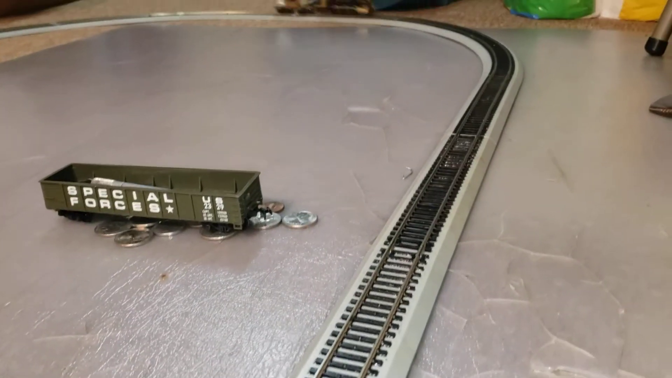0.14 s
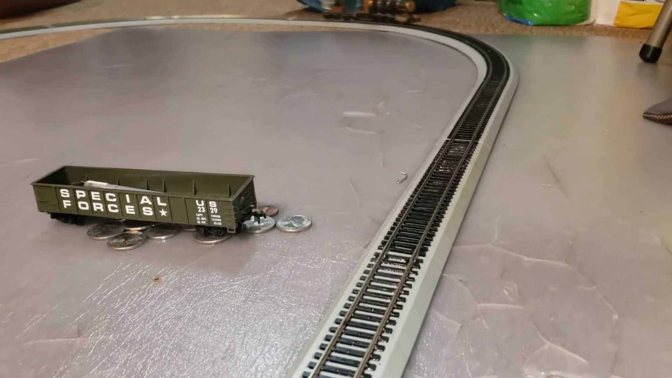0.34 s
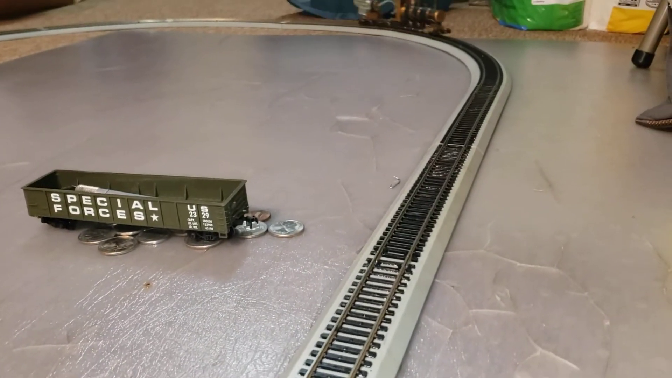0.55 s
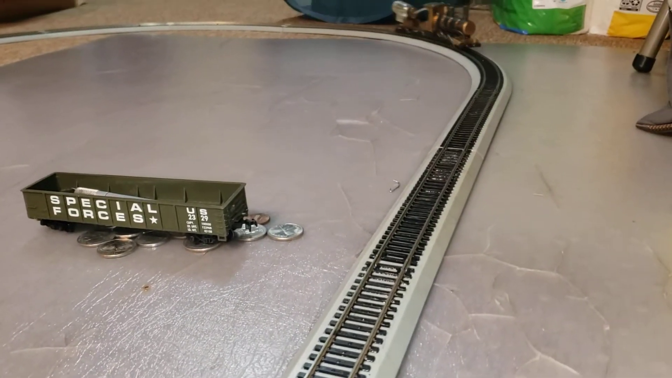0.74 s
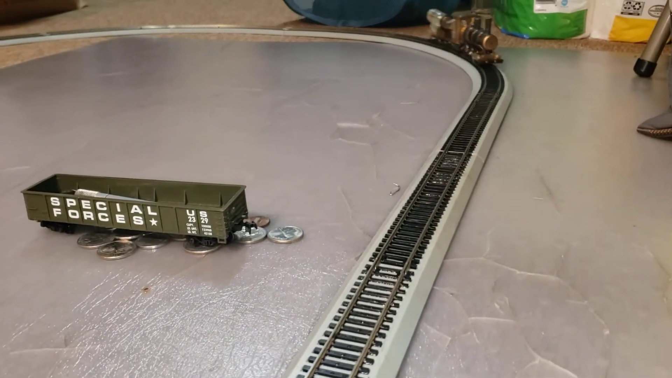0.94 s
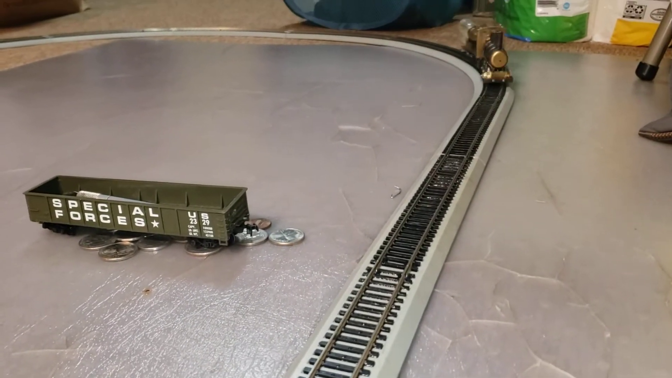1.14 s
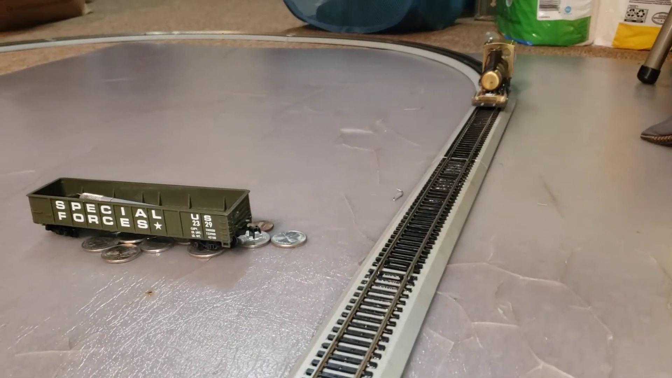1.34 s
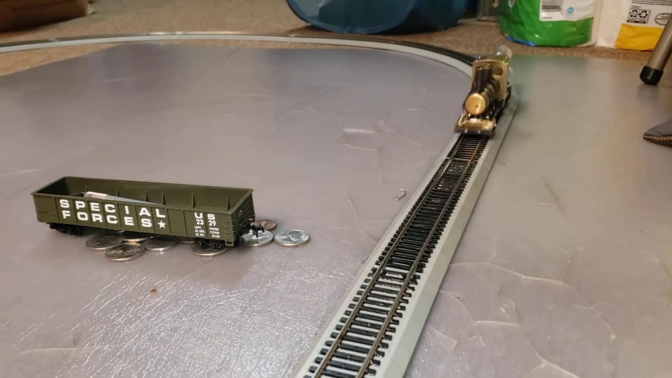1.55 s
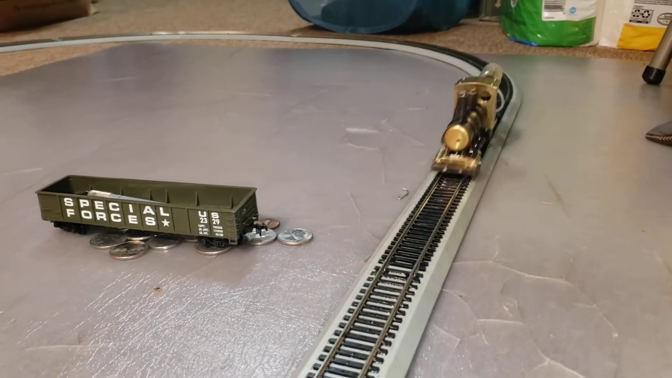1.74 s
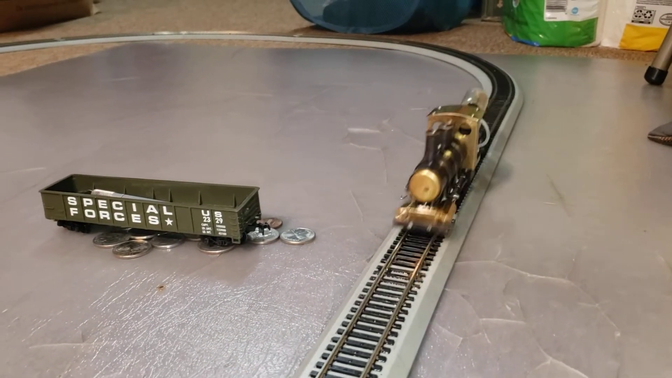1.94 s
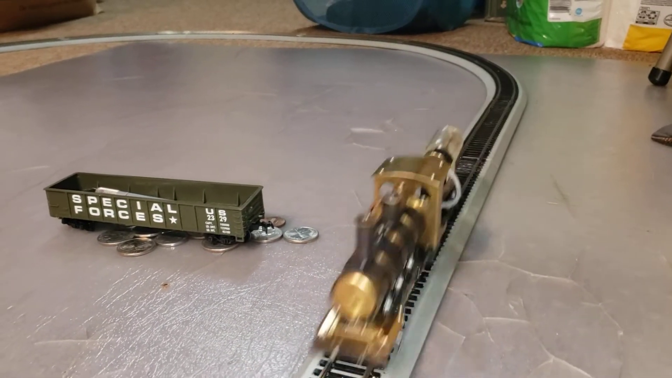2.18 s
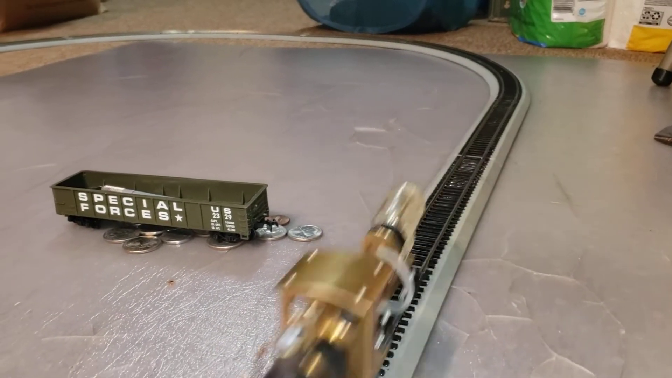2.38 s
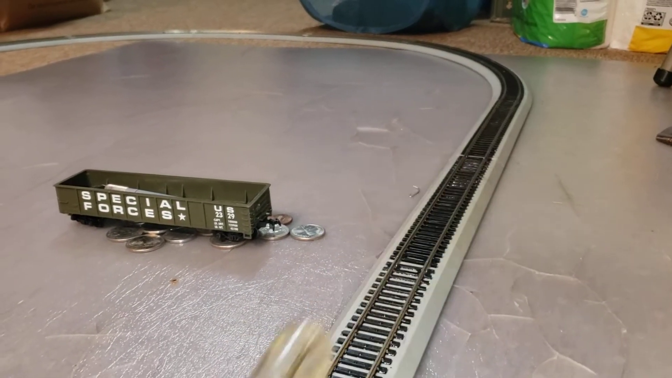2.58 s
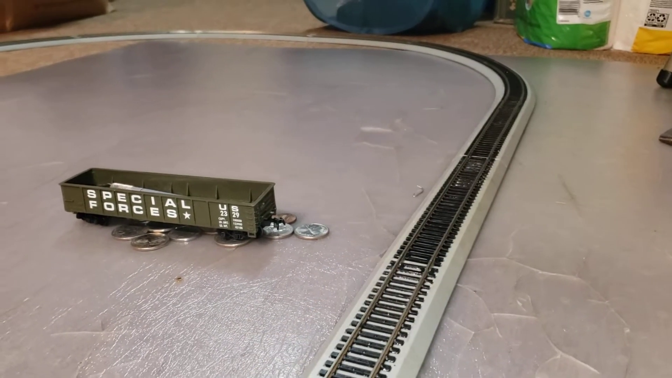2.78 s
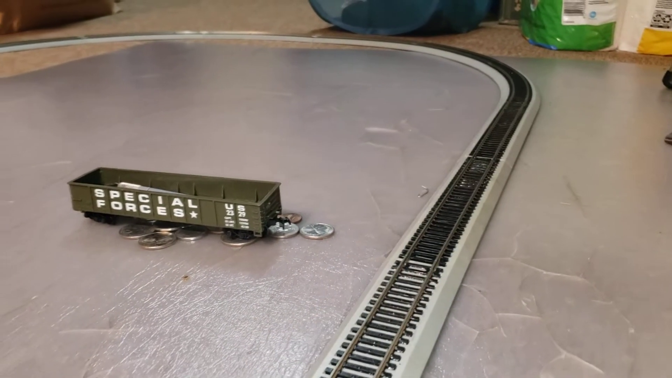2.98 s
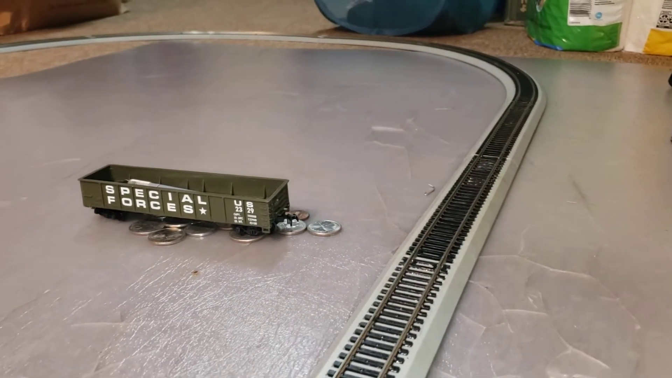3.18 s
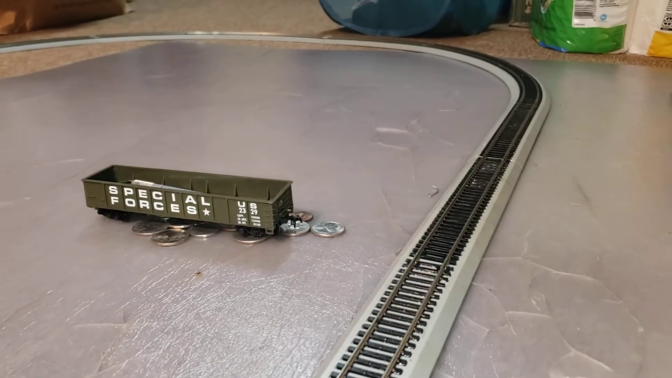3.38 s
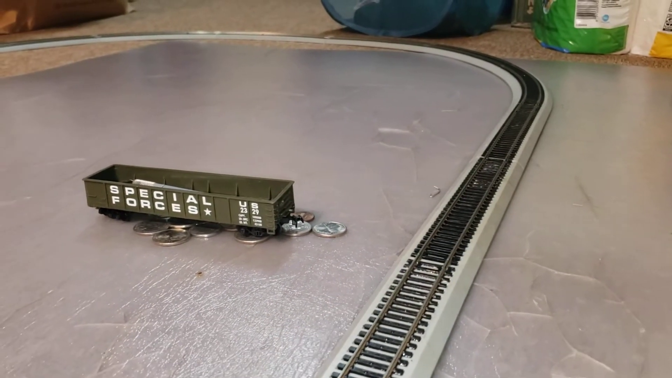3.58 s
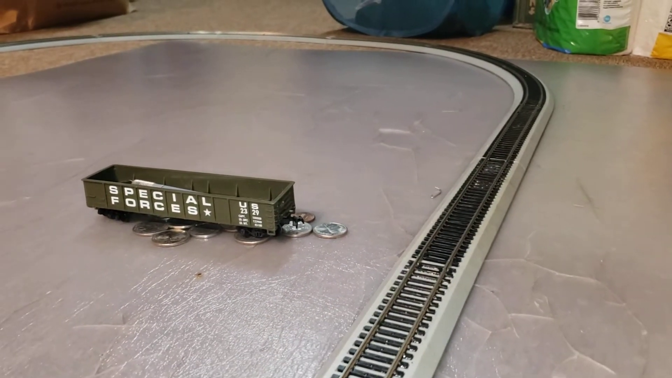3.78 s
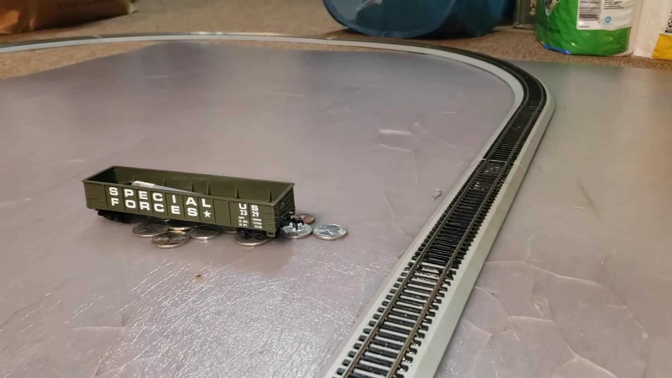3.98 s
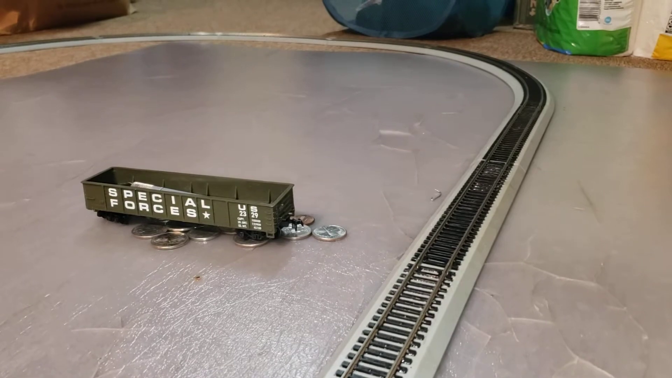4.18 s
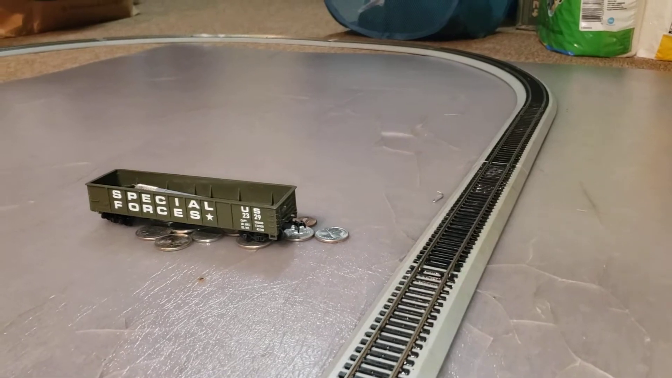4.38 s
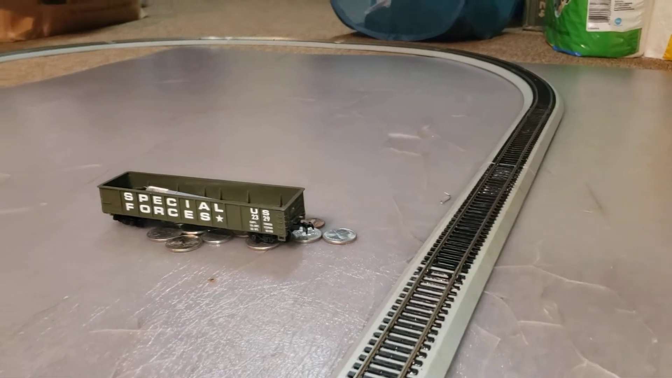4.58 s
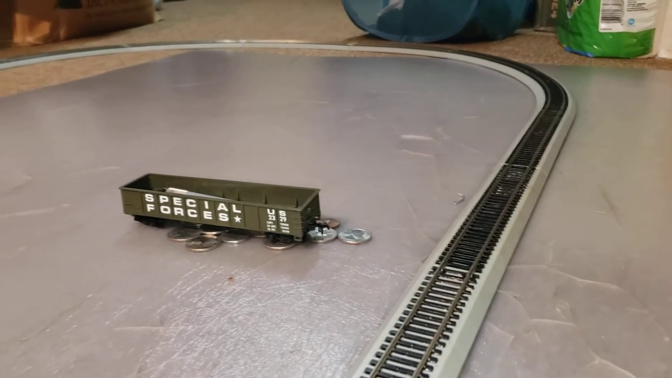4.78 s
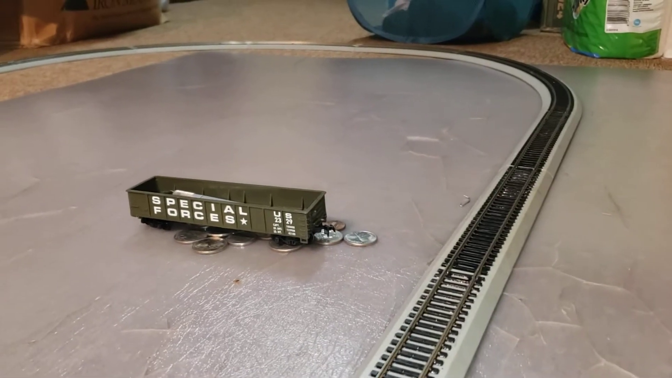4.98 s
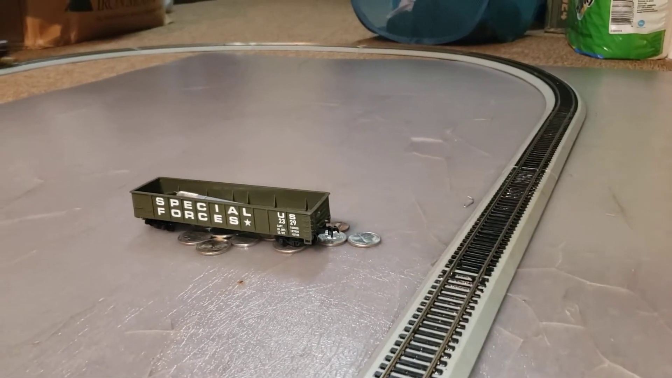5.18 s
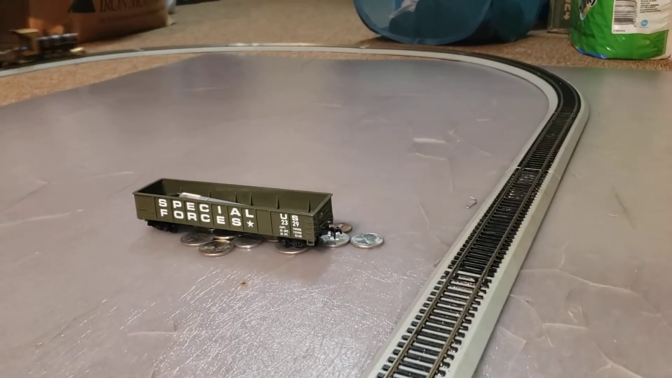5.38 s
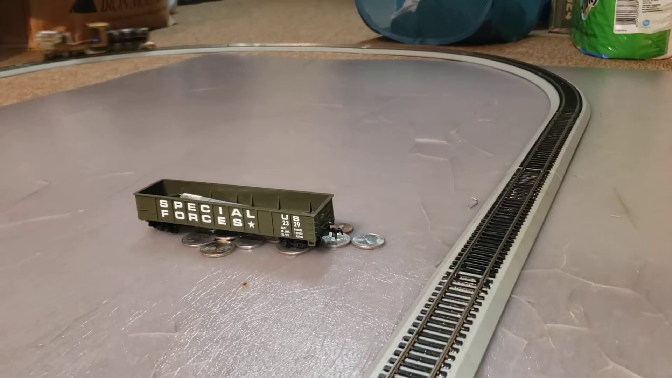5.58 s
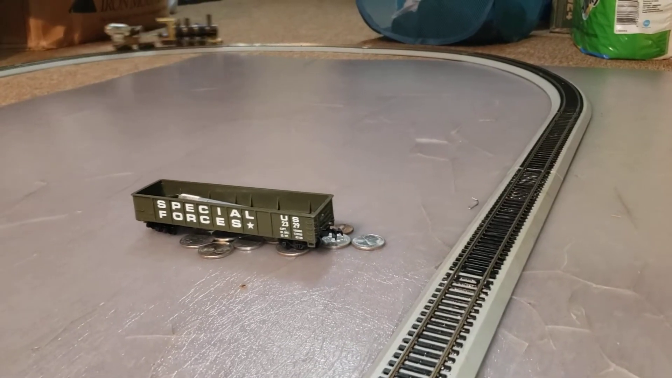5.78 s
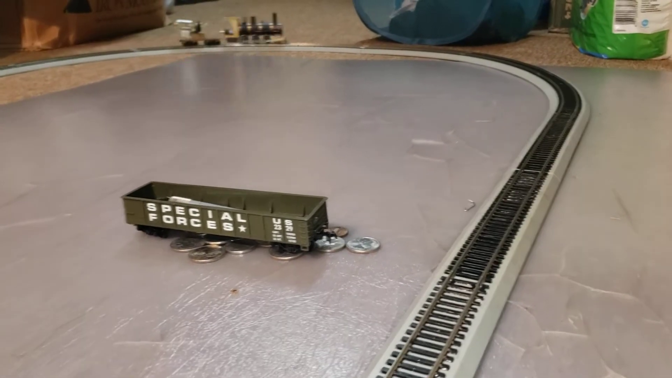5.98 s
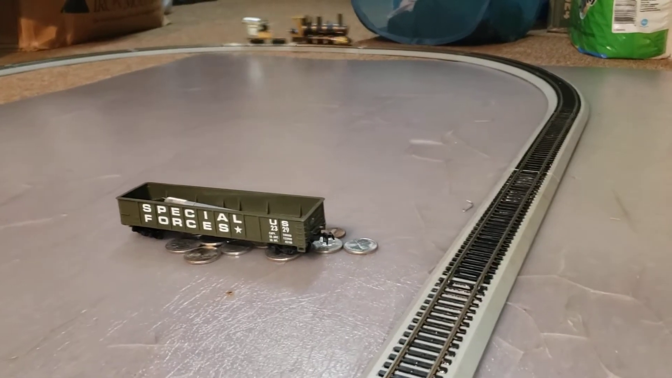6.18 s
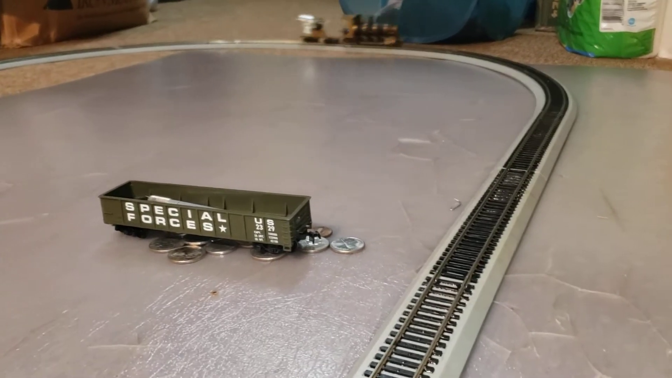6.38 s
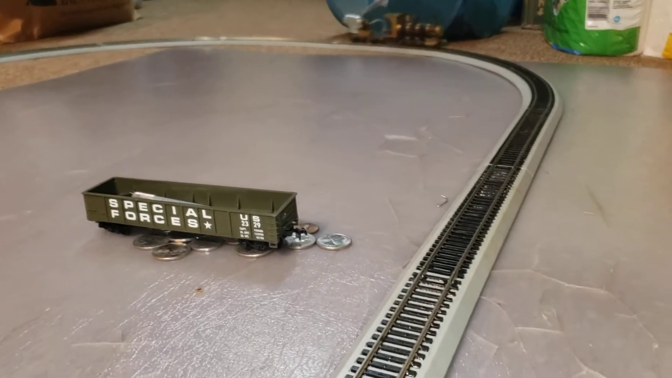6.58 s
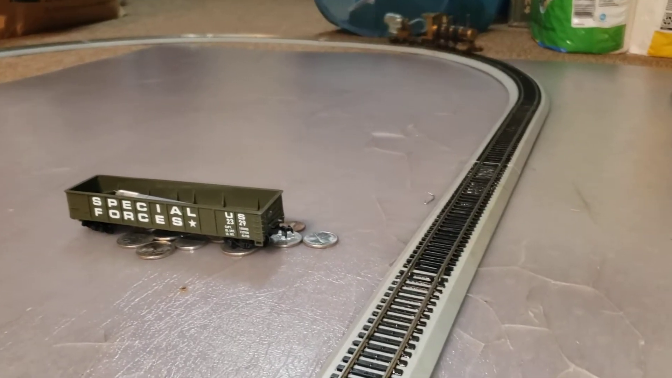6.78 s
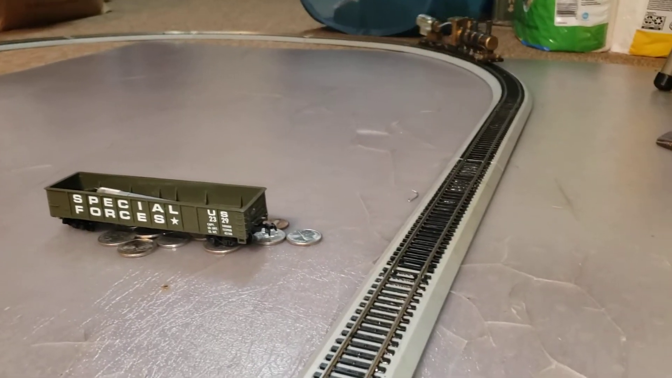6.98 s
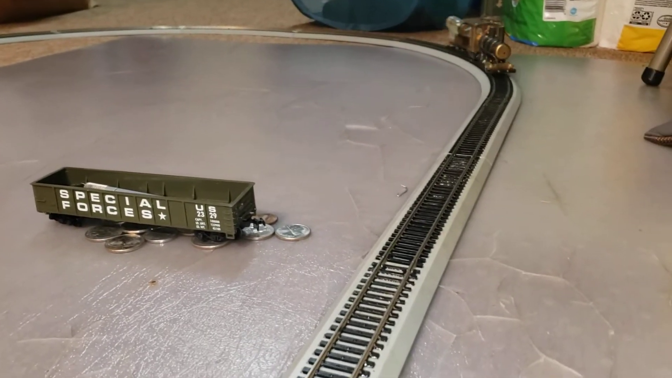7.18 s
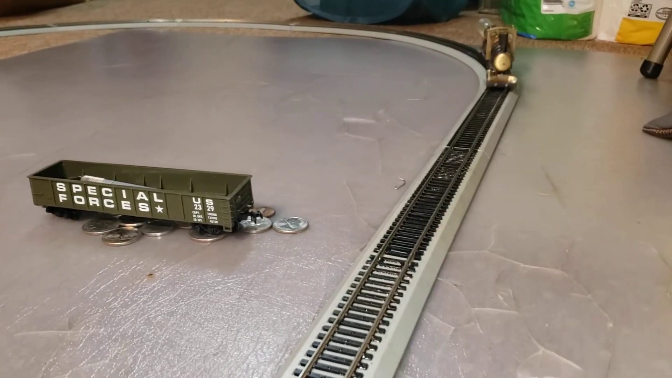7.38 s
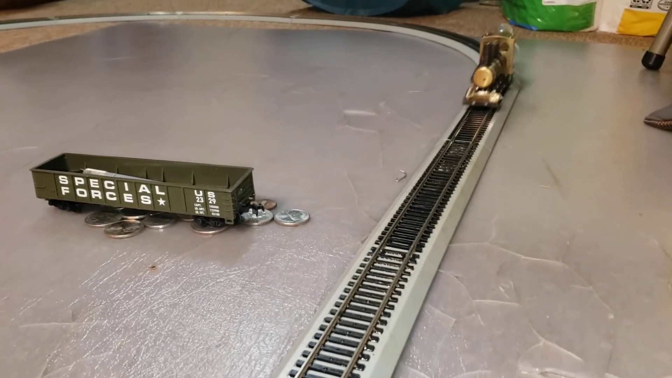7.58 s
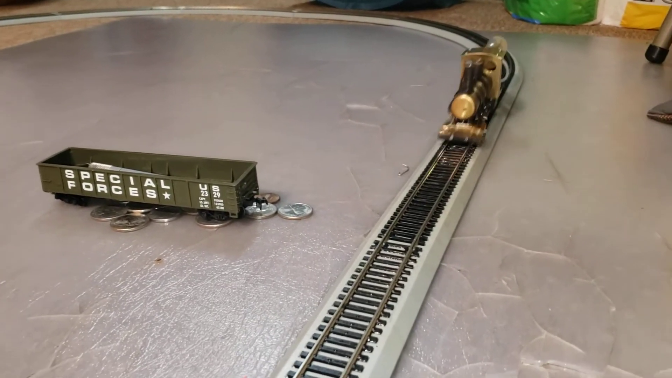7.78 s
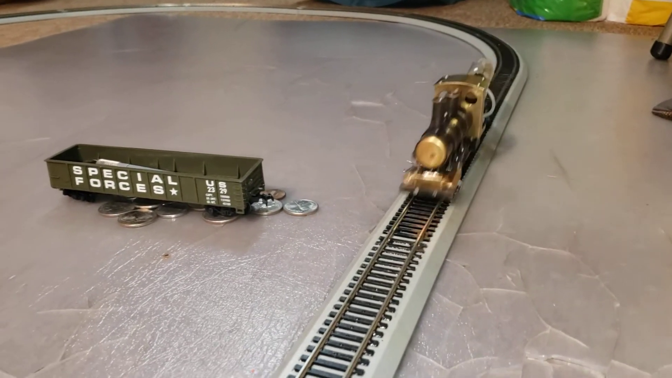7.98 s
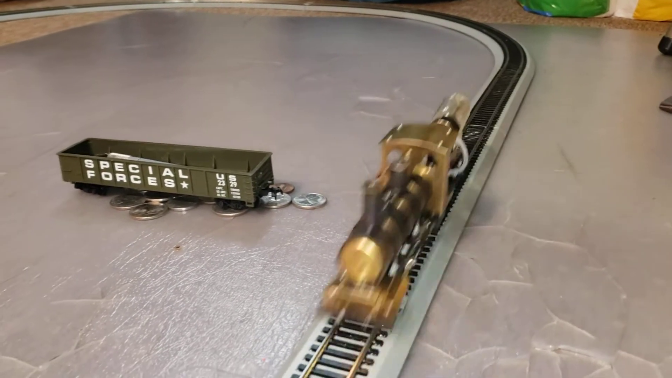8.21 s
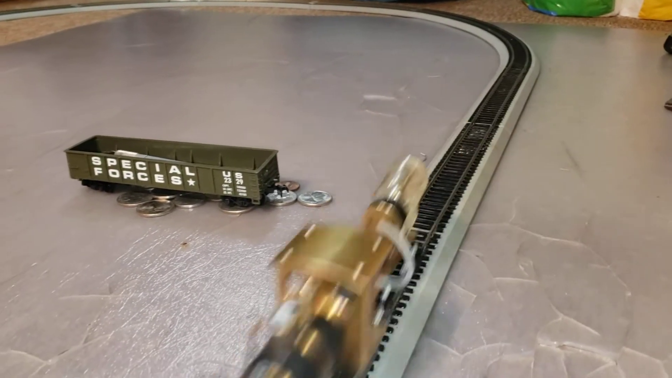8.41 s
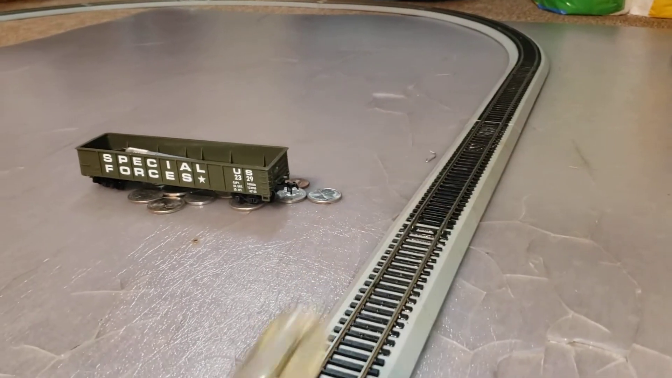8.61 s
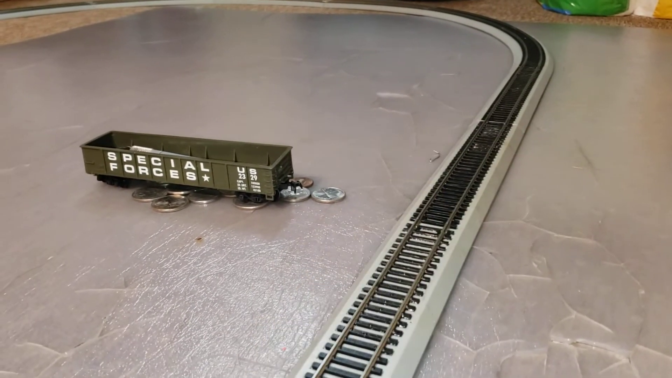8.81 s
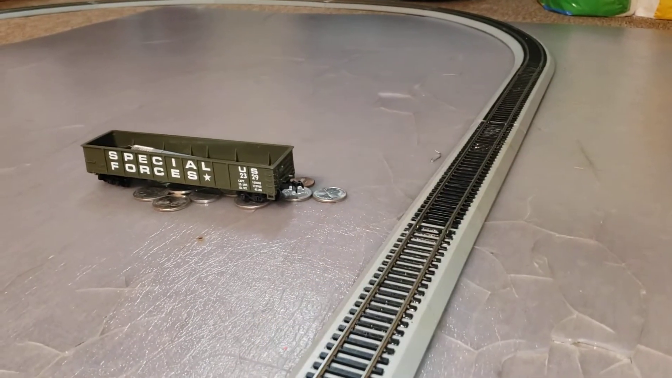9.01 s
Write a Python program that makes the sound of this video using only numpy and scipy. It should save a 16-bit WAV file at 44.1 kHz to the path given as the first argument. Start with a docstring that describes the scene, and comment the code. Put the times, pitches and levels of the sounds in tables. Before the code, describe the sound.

Close indoor pickup of a miniature steam engine circling: crackling bright hiss swells, recedes, then returns, over wheel grind and light track knocks.

```python
"""A small room with a hard floor: a small live-steam engine laps an oval of plastic-bedded track, close to a phone.
Filtered noise hisses and sputters as steam; exhaust puffs and spits are noise puffs with short cracks of water.
Noise grains through resonances make the wheels grind and the bed rumble; damped tones make knocks and ticks.
The phone's two ports hear it with their own lag, level and resonance, over short echoes and finger bumps."""
import sys
import numpy as np
from scipy import signal
from scipy.fft import rfft, irfft
from scipy.io import wavfile
from scipy.ndimage import uniform_filter1d

SR = 44100
rng = np.random.default_rng(int(sys.argv[2]) if len(sys.argv) > 2 else 0)


def unload_wav(signal):
    """Save mono or channel-first audio to the path in sys.argv[1] as 16-bit WAV at rate SR, clipped to [-1, 1]."""
    wavfile.write(
        sys.argv[1],
        SR,
        np.round(np.clip(np.atleast_2d(signal).T, -1, 1) * 32767).astype(np.int16),
    )


N = 399105
LAP_S = 6.01

# engine position: (time into lap [s], distance [m], lead of left port [ms])
ENGINE_PLACE = [(0, 2.14, 0.043), (.55, 2.47, 0.0055), (1.1, 2.15, -0.068), (1.6, 1.17, -0.072),
                (1.95, 0.97, -0.078), (2.2, 0.93, 0.024), (2.4, 0.67, 0.071), (2.7, 0.49, 0.15),
                (3.05, 0.72, 0.417), (3.5, 1.26, 0.46), (4.2, 2.18, 0.47), (4.6, 1.65, 0.38),
                (5.2, 1.96, 0.31)]


def engine_place():
    """Distance in m and left-port lead in ms, repeating each lap."""
    return lap(ENGINE_PLACE)


# jet, nominal: (time into lap [s], hiss level [dB], thin top level [dB], top left minus right [dB])
JET_LEVELS = [(0, -57, -52, 2), (.3, -51.5, -48.5, -5), (.6, -48, -52, -4), (1, -48.5, -53, -6),
              (1.5, -45.5, -53, -1), (2, -44, -44, -9), (2.4, -40.5, -36.5, 0), (2.65, -43, -39, -9),
              (2.9, -36, -36, -4), (3.15, -37.5, -34, -2), (3.55, -40, -40.5, 12), (3.75, -46, -41.5, 7),
              (4.05, -49, -46.5, -2), (4.3, -53, -46.5, 3), (5.1, -51, -50, 2), (5.5, -50.5, -46.5, -1)]
JET_GAIN_DB_PER_LAP = 1
SURGE_S, SURGE_HALF_S, SURGE_DB = 6.28, 0.16, 3


def jet_levels():
    """Hiss level, top level and top pan; pressure creeps up and surges once."""
    hiss_db, top_db, top_pan_db = lap(JET_LEVELS)
    t = np.arange(N) / SR
    pressure_db = JET_GAIN_DB_PER_LAP * t / LAP_S + SURGE_DB * hump(t - SURGE_S, SURGE_HALF_S)
    return hiss_db + pressure_db, top_db + pressure_db, top_pan_db


def steam(hiss_db, top_db, hiss_pan_db, top_pan_db):
    """A jet that sputters as droplets flash; its thin top beams another way than its body."""
    jet = noise(direct=0.034) * (1 + 0.35 * grains(90, 3.5, 0.0014))
    sputter = 1 + 0.25 * grains(62, 4, 0.006)
    body = unit(band(jet * sputter, 5770, 13350))
    body = body * undb(hiss_db + walk(18)) * sides(hiss_pan_db)
    top_sputter = 1 + 0.27 * grains(60, 6.1, 0.0031)
    top = unit(band(jet * top_sputter, 11030, 16000))
    top = top * undb(top_db + 0.65 * walk(21)) * sides(top_pan_db)
    return body + top


# single puffs and sharp spits, on and off the beat:
# (time [s], level [dB], colour [Hz], wetness [0-1, soft puff to sharp spit])
PUFFS_AND_SPITS = [(0.265, -19, 12500, 0.33), (.466, -27.5, 10300, 0.8), (.6242, -33, 11500, .9),
                   (0.7662, -27, 11900, 0.8), (0.9145, -13.5, 10500, 0.86), (1.2625, -22, 11400, .9),
                   (1.585, -19, 10300, 0.45), (1.698, -14, 10300, 0.4), (1.937, -12, 10000, 0.5),
                   (2.167, -16, 13800, 0.9), (2.202, -10, 13000, 0.6), (2.2189, -13.5, 12900, 0.55),
                   (2.3124, -11, 11300, 0.9), (2.4036, -8, 10500, 0.64), (2.4289, -11, 12900, .45),
                   (2.489, -14, 10400, 1), (2.5305, -12.5, 11800, 1), (2.9762, -15, 10400, 0.8),
                   (2.9957, -16, 10600, 0.8), (3.031, -11, 13200, .65), (3.0556, -15, 11500, 0.6),
                   (3.274, -5.5, 14900, 0.4), (3.327, -17, 11600, 0.6), (3.3516, -19, 11400, 1),
                   (3.5602, -12, 10200, 0.5), (3.6377, -15.5, 13900, 0.2), (3.874, -14.5, 12900, 0.5),
                   (4.587, -18, 14500, .5), (5.2303, -23, 12900, 0.4), (5.502, -25, 11500, 0),
                   (6.7177, -25.5, 10600, 0.7), (6.8874, -24.5, 10500, 0.4), (6.966, -17, 10150, 0.36),
                   (7.0, -20, 11000, 0.7), (7.214, -9, 10500, 0.3), (7.265, -12, 10420, 0.88),
                   (7.3153, -11, 9450, 1), (7.5208, -22, 10840, 0.79), (7.6794, -16.5, 10300, 0.6),
                   (7.7478, -15, 10200, 0.47), (7.7773, -18, 9960, 0.5), (8.0134, -20, 9900, 0.6),
                   (8.2317, -14, 13200, 0.77), (8.247, -10.5, 12800, 0), (8.2653, -22, 12360, .7),
                   (8.4136, -5.5, 13400, 0.54), (8.443, -11.5, 12700, 0.1), (8.5763, -9.5, 10600, 0.9),
                   (8.7283, -19, 11600, 0.2), (8.9114, -21.5, 10900, 0.3), (8.959, -11, 11000, 0.3),
                   (8.9806, -16, 11000, 0.93), (9.015, -15, 12880, 0.7)]
# running count of exhaust beats, setting the engine's pace: (time [s], count [beats])
BEAT_COUNT_AT = [(-.02, -7), (.478, 0), (.915, 7), (1.275, 13), (1.444, 16), (1.698, 21), (1.937, 26),
                 (2.313, 34), (2.612, 41), (6.104, 111), (6.289, 114), (6.815, 124), (7.41, 136),
                 (8.116, 152), (8.577, 163), (9.06, 175)]
BEAT_DB, BEAT_DB_PER_MS, BEAT_SCATTER_DB = 22, -18, 3  # over the hiss; per ms of left lead
BEAT_HZ, BEAT_HZ_PER_MS, BEAT_SCATTER_HZ = 12300, 6030, 500
BEAT_JITTER_S, BEAT_WET, BEAT_CLEARANCE_S = 0.0015, 0.15, 0.012
PUFF_RISE_S = 0.0011


def exhaust_rows(hiss_db, lead_ms):
    """Single puffs and spits plus the regular beats that fall clear of them."""
    when, count = np.transpose(BEAT_COUNT_AT)
    s = np.interp(np.arange(count[0], count[-1]), count, when)
    chance = rng.standard_normal((N // 1000, 3))[:len(s)].T
    s = np.clip(s - 2 * PUFF_RISE_S + BEAT_JITTER_S * chance[0], 0.02, N / SR - 0.02)
    i = (s * SR).astype(int)
    db = hiss_db[i] + BEAT_DB + BEAT_DB_PER_MS * lead_ms[i] + BEAT_SCATTER_DB * np.tanh(chance[1])
    hz = BEAT_HZ + BEAT_HZ_PER_MS * lead_ms[i] + BEAT_SCATTER_HZ * chance[2]
    regular = np.transpose([s, db, hz, np.full(len(s), BEAT_WET)])
    gap_s = np.abs(s[:, None] - np.array(PUFFS_AND_SPITS)[:, 0]).min(axis=1)
    return np.vstack([PUFFS_AND_SPITS, regular[gap_s > BEAT_CLEARANCE_S]])


FLOOR_LAG_S, FLOOR_DB = 0.0004, -5.5  # the floor mirrors each crack


def puffs(rows, pan_db):
    """A puff of steam swells and fades; a droplet cracks at its height in under a millisecond."""
    lead_in_s = 0.015
    out, t = np.zeros((2, N)), np.arange(int(0.05 * SR)) / SR - lead_in_s
    rush = rng.standard_normal((N // 1000, len(t)))
    for (s, db, hz, wet), air in zip(rows, rush):
        wet = np.clip(wet, 0, 1)
        crack_decay = np.exp(-np.where(t < 0, -t / 0.0001, t / 0.00009))
        crack = 1.76 * wet * np.cos(2 * np.pi * hz * t) * crack_decay
        crack = crack + undb(FLOOR_DB) * np.interp(t - FLOOR_LAG_S, t, crack)
        # the wetter the row, the more sudden its start
        rise_s = 0.0002 + 0.0012 * (1 - wet) ** 2
        fall_s = 0.0012 + 0.0016 * (1 - wet)
        swell = np.exp(-np.where(t < 0, -t / rise_s, t / fall_s))
        puff = swell * band(air, hz - 2000, hz + 2500)
        puff = 0.38 * (1 - 0.92 * wet) * puff * np.sqrt(np.sum(swell ** 2) / np.sum(puff ** 2))
        # broadband blow of the valve gear
        blow = 0.16 * air * (t > 0) * np.exp(-np.abs(t) / 0.00068)
        pan = sides(pan_db[int(s * SR)])
        add(out, s + PUFF_RISE_S - lead_in_s, undb(db) * np.outer(pan, crack + puff + blow))
    return out


# rail resonances, low then high: (centre [Hz], width [Hz], relative level [dB])
RAIL_DRONE = [(1050, 340, 0), (1775, 730, 5.5), (2405, 1060, 3.5)]
RAIL_GRIT = [(3220, 1090, 8), (4020, 200, -2.5), (5410, 1020, -1)]
DRONE_DB, GRIT_DB, RAIL_NOTES_DB = -45.5, -45, -50  # nominal at 1 m
BEATS_PER_TURN = 4


def wheels(near_db, pan_db):
    """Rough treads excite the rails in dense grains, throbbing as the wheels and rods go round."""
    beat = np.interp(np.arange(N) / SR, *np.transpose(BEAT_COUNT_AT))
    turn = 2 * np.pi * beat / BEATS_PER_TURN
    throb = undb(0.19 * np.sin(turn) + 0.51 * np.sin(2 * turn))
    tread = noise(direct=0.28) * throb
    low_tread = noise(direct=0.45) * throb * (1 + 0.33 * grains(140, 7.1, 0.0056))
    drone = unit(ring(low_tread, RAIL_DRONE)) * undb(DRONE_DB + near_db)
    high_tread = tread * (1 + 0.62 * grains(250, 1.7, 0.0015))
    grit = unit(ring(high_tread, RAIL_GRIT)) * undb(GRIT_DB + near_db)
    notes = rail_notes(tread) * undb(RAIL_NOTES_DB + near_db)
    return (drone + grit + notes + noise_swells(tread)) * sides(pan_db)


# bands of noise, some wheel growl and some steam hiss:
# (time of first peak [s], half length [s], centre [Hz], width [Hz], level [dB])
NOISE_SWELLS = [(1.347, 0.7, 4080, 700, -55), (1.91, 0.26, 3220, 900, -51.5),
                (2.048, 0.27, 1630, 400, -47.5), (2.018, 0.12, 1130, 350, -55.5),
                (2.456, 0.29, 2410, 1180, -45), (2.497, 0.34, 4630, 1600, -52.5),
                (2.722, 0.18, 1685, 597.3, -51), (2.8, 0.25, 11600, 1400, -43),
                (3.95, 0.39, 14600, 1600, -44.5), (4.3, 0.64, 1720, 190, -52.5),
                (5.005, 1, 684, 240, -62.5), (5.845, 0.17, 2550, 400, -58), (6.234, 0.2, 1502, 160, -56),
                (6.791, 0.82, 710, 300, -68), (8.428, .2, 2530, 1798, -51)]
SWELL_FLUTTER_DB = 2


def noise_swells(source):
    """Bands of noise, some wheel growl and some steam hiss, that swell at the same spots each lap."""
    out, t = np.zeros((2, N)), np.arange(N) / SR
    for s, half_s, hz, width_hz, db in NOISE_SWELLS:
        swell = hump((t - s + half_s) % LAP_S - half_s, half_s) * (t > s - half_s)
        noise_band = unit(band(source, hz - width_hz / 2, hz + width_hz / 2))
        out = out + undb(db + SWELL_FLUTTER_DB * walk(14)) * swell * noise_band
    return out


RAIL_NOTE_WIDTH_HZ, RAIL_NOTE_WANDER_DB = 59, 3.5


def rail_notes(tread, count=22):
    """Many narrow rail resonances, each swelling and fading on its own."""
    notes_hz = np.geomspace(1350, 4800, count) * (1 + 0.02 * rng.standard_normal(count))
    half_hz = RAIL_NOTE_WIDTH_HZ / 2
    return unit(sum(undb(RAIL_NOTE_WANDER_DB * walk(16)) * band(tread, hz - half_hz, hz + half_hz, order=1)
                    for hz in notes_hz))


# ticks, rattles, squeaks of rods, couplings, flanges:
# (time [s], nominal peak level [dB], pitch [Hz], ring [ms])
METAL_TICKS = [(1.966, -34, 2840, 3), (2.33, -31, 1920, 3.7), (2.412, -32.5, 1270, 1.6),
               (2.431, -31, 2660, 2.7), (2.483, -29, 4200, 2), (2.612, -30.5, 2370, 2.6),
               (2.653, -36, 1690, 4), (2.756, -31, 2910, 3), (3.034, -31, 2600, 1.8), (3.564, -33, 3560, 3),
               (3.641, -34.5, 3620, 1.8), (3.874, -37.5, 3340, 2), (4.6763, -30, 3140, 0.65),
               (4.6777, -28, 980, .5), (5.166, -42, 3800, 3), (5.232, -41, 3700, 2.7),
               (5.261, -37, 3800, 1.5), (7.376, -38, 4090, 6.8), (7.542, -40, 4000, 8.5),
               (7.71, -31, 3860, 1.7), (7.868, -44, 3300, 4.2), (7.937, -39, 1620, 42),
               (8.017, -37, 2870, 4.5), (8.349, -30, 2010, 1.02), (8.414, -29, 2947, 3.3),
               (8.45, -34, 2760, 3.3), (8.493, -31.5, 2500, 4.2), (8.745, -33, 3100, 2.4),
               (9.015, -38.5, 4560, 2)]
TICK_RISE, TICK_ROUGH = 0.4, 1.1  # rise as share of ring; loose rattle as share of tone


def ticks(pan_db):
    """Short blows and scrapes, each ringing near its pitch with a loose rattle around it."""
    out, t = np.zeros(N), np.arange(-1300, 3500) / SR
    loose = rng.standard_normal((len(METAL_TICKS), len(t)))
    for (s, db, hz, ring_ms), air in zip(METAL_TICKS, loose):
        rattle = unit(band(air, 0.75 * hz, 1.5 * hz, order=1))
        shake = np.cos(2 * np.pi * hz * t) + TICK_ROUGH * rattle
        decay = np.exp(-np.where(t < 0, -t / TICK_RISE, t) * 1000 / ring_ms)
        add(out, s + t[0], undb(db) * shake * decay)
    return out * sides(pan_db)


# bed resonances: (centre [Hz], width [Hz], relative level [dB])
BED_MODES = [(214.7, 122, 5), (363, 268, 6.5)]
# bed lies unevenly on the floor: (time into lap [s], level over that due to distance [dB])
BED_ON_FLOOR = [(0, -1), (.6, -2.5), (1.5, 1), (1.8, -4), (2.15, 3.5), (2.5, -6.5), (3.6, 2.5), (4.5, 0),
                (4.9, -13.5), (5.3, -3.5), (5.65, -8.5)]
BED_DB = -53.5  # nominal at 1 m
BED_FALLOFF = 0.68  # share of the wheels' fall with distance: the track carries it along


def bed(near_db, wheel_pan_db):
    """The hollow track bed rumbles in lumps and knocks at rail joints."""
    lumps = noise(direct=0.94) * (1 + 0.71 * grains(45, 2.4, 0.008))
    level_db = BED_DB + BED_FALLOFF * near_db + lap(BED_ON_FLOOR)[0]
    rumble = unit(ring(lumps, BED_MODES, order=2)) * undb(level_db)
    return (rumble + knocks()) * sides(0.5 + 0.1 * wheel_pan_db)


# wheels over rail joints: (time [s], nominal peak level [dB], pitch [Hz])
JOINT_KNOCKS = [(1.484, -34.5, 300), (2.163, -30.5, 216), (2.516, -40, 315), (2.58, -37, 221),
                (2.897, -31.5, 626), (3.2, -33.5, 380), (3.436, -35.5, 318), (3.489, -33, 550),
                (3.778, -33, 337), (4.532, -34.5, 450), (8.196, -35, 226), (8.585, -35, 290),
                (8.888, -31.5, 336)]


def knocks():
    """Each joint gives a damped tone with a loose rattle."""
    out, t = np.zeros(N), np.arange(int(0.06 * SR)) / SR
    rattle = rng.standard_normal((len(JOINT_KNOCKS), len(t)))
    for (s, db, hz), loose in zip(JOINT_KNOCKS, rattle):
        shake = np.sin(2 * np.pi * hz * t) + 0.93 * unit(band(loose, 234, 460, order=1))
        add(out, s, undb(db) * shake * np.exp(-t / 0.008) * (1 - np.exp(-t / 0.0046)))
    return out


ROOM_T60_S, ROOM_DB = 0.066, -9.5


def room(hits):
    """Diffuse echoes of the hits, unrelated at the two ports."""
    t = np.arange(int(0.3 * SR)) / SR
    tail = rng.standard_normal((2, len(t))) * undb(-60 * t / ROOM_T60_S) * (t > 0.001)
    tail = tail / np.sqrt(np.sum(tail ** 2, axis=1, keepdims=True))
    return undb(ROOM_DB) * signal.fftconvolve(hits, tail, axes=1)[:, :N]


# fingers bump the phone: (time [s], level before pan [dB])
FINGER_BUMPS = [(0.0804, -33), (2.079, -51), (2.293, -46), (3.082, -45.5), (4.54, -49), (4.71, -47),
                (7.044, -48), (7.909, -50)]
GRIP_DB, GRIP_WANDER_DB = -67, 2


def bumps(hz=76, t60_s=0.16, thud_pan_db=-18, grip_pan_db=-8):
    """Dull thuds through the case, mostly at the right port, over a faint rumble of the grip."""
    out, t = np.zeros(N), np.arange(int(0.2 * SR)) / SR
    for s, db in FINGER_BUMPS:
        # a hard bump starts with a quick swing that sags to the case's own note
        sag = 150 * undb(db) * (1 - np.exp(-t / 0.00065))
        add(out, s, undb(db - 60 * t / t60_s) * np.sin(2 * np.pi * hz * t + sag))
    rumble = unit(band(rng.standard_normal((2, N)), 40, 91))
    rumble = undb(GRIP_DB + GRIP_WANDER_DB * walk(11)) * rumble
    return out * sides(thud_pan_db)[:, None] + rumble * sides(grip_pan_db)[:, None]


def undb(db):
    """dB to amplitude."""
    return 10 ** (np.asarray(db) / 20)


def unit(x):
    """Scale to RMS 1."""
    return x / np.sqrt(np.mean(x ** 2))


def band(x, lo_hz, hi_hz, order=2):
    """Butterworth band-pass."""
    sos = signal.butter(order, [lo_hz, min(hi_hz, 0.45 * SR)], "band", fs=SR, output="sos")
    return signal.sosfilt(sos, x)


def ring(x, modes, order=1, wander_db=1.7):
    """Sum of resonances, each waxing and waning at each port on its own."""
    out = 0
    for hz, width_hz, db in modes:
        path_db = wander_db * np.array([walk(9), walk(9)])
        out = out + undb(db + path_db) * band(x, hz - width_hz / 2, hz + width_hz / 2, order=order)
    return out


def walk(rate_hz):
    """Random levels held 1 / rate_hz and smoothed twice; spread near 1.7."""
    k = int(SR / rate_hz)
    steps = np.repeat(rng.standard_normal(N // k + 1), k)
    return 2.33 * uniform_filter1d(uniform_filter1d(steps, k), k)[:N]


def grains(per_s, spread_db, tail_s):
    """Envelope of random bursts, many small and few large, each swelling quickly and dying away."""
    hits = (rng.random(N) < per_s / SR) * undb(spread_db * np.minimum(rng.exponential(size=N), 3))
    pole = np.exp(-2 / (tail_s * SR))
    power = signal.lfilter([1], [1, -2 * pole, pole ** 2], hits ** 2)
    return unit(np.sqrt(np.abs(power)))


def noise(direct):
    """Two-port noise: a share of power straight from the engine, the rest scattered and unrelated."""
    direct = np.clip(direct, 0, 1)
    shared = np.sqrt(direct) * rng.standard_normal(N)
    return shared + np.sqrt(1 - direct) * rng.standard_normal((2, N))


def sides(pan_db):
    """Left and right gains from left minus right in dB."""
    return undb(np.array([pan_db, -pan_db]) / 2)


def add(out, s, x):
    """Mix x into out from s seconds on."""
    i = int(s * SR)
    out[..., i:i + x.shape[-1]] += x[..., :N - i]


def lap(table):
    """Columns of a table over time, repeated every lap."""
    s, *columns = np.transpose(table)
    return [np.interp(np.arange(N) / SR, s, c, period=LAP_S) for c in columns]


def hump(s, half_s):
    """A smooth swell around each moment where s is zero."""
    return np.cos(np.pi / 2 * np.clip(s / half_s, -1, 1)) ** 2


WHEEL_GAIN_DB_PER_LAP = 0.62
# left minus right with no lead, then per ms of left lead
WHEEL_PAN_DB, HISS_PAN_DB, PUFF_PAN_DB = 3.5, 1, -1
WHEEL_PAN_DB_PER_MS, HISS_PAN_DB_PER_MS, PUFF_PAN_DB_PER_MS = 5, 13, 15


def scene():
    """Place the engine's sounds along the lap, lag the left port, add echoes and bumps."""
    metres, lead_ms = engine_place()
    hiss_db, top_db, top_pan_db = jet_levels()
    near_db = -20 * np.log10(metres) + WHEEL_GAIN_DB_PER_LAP * np.arange(N) / SR / LAP_S
    wheel_pan_db = WHEEL_PAN_DB + WHEEL_PAN_DB_PER_MS * lead_ms
    hiss_pan_db = HISS_PAN_DB + HISS_PAN_DB_PER_MS * lead_ms
    puff_pan_db = PUFF_PAN_DB + PUFF_PAN_DB_PER_MS * lead_ms
    hits = puffs(exhaust_rows(hiss_db, lead_ms), puff_pan_db) + ticks(wheel_pan_db)
    engine = steam(hiss_db, top_db, hiss_pan_db, top_pan_db) + hits
    engine = engine + wheels(near_db, wheel_pan_db) + bed(near_db, wheel_pan_db)
    # the left port hears the engine earlier or later as it goes round; 4x oversampled
    fine = signal.resample_poly(engine[0], 4, 1)
    left = np.interp(4 * (np.arange(N) + lead_ms * SR / 1000), np.arange(4 * N), fine)
    return np.array([left, engine[1]]) + room(hits) + bumps()


# response of the two ports: (frequency [Hz], left level [dB], right level [dB])
PORT_RESPONSE = [(40, -14, -13), (154, 0, -1.5), (656, -1.5, -1), (940, -1.5, 1.5), (5210, -0.5, 4.5),
                 (6600, -1.5, -4), (9300, -0.5, 5.5), (10520, 1, 8.5), (12130, 2.5, 0.5),
                 (14800, 3.5, -3.5), (16100, 10, -6.5)]
TOP_HZ = 15700


def record(dry):
    """Each port colours the sound with its own causal (minimum-phase) response; the top is cut."""
    hz, *dbs = np.transpose(PORT_RESPONSE)
    log_grid = np.log(np.linspace(1, SR / 2, 4097))
    out = []
    for x, db in zip(dry, dbs):
        ceps = irfft(np.log(undb(np.interp(log_grid, np.log(hz), db))))
        # fold the cepstrum onto positive time
        ceps[1:4096] *= 2
        ceps[4097:] = 0
        out.append(signal.fftconvolve(x, irfft(np.exp(rfft(ceps))))[:N])
    top_cut = signal.ellip(10, 0.2, 70, TOP_HZ, fs=SR, output="sos")
    return signal.sosfilt(top_cut, np.array(out))


dry = scene()
out = record(dry)
unload_wav(out)
```